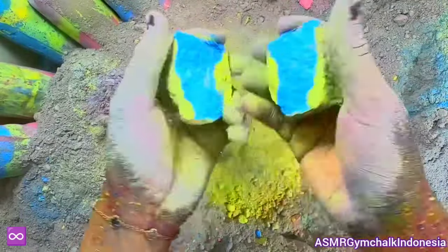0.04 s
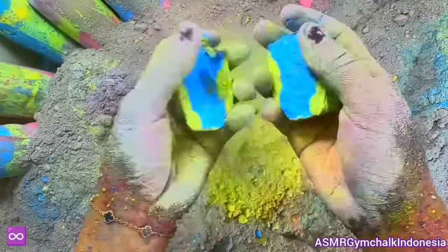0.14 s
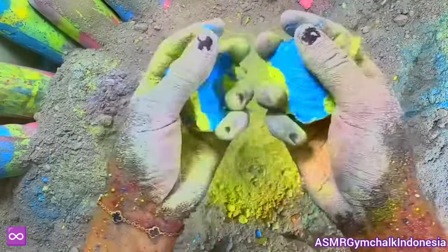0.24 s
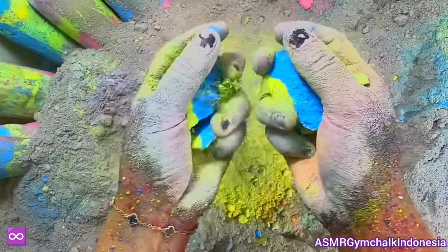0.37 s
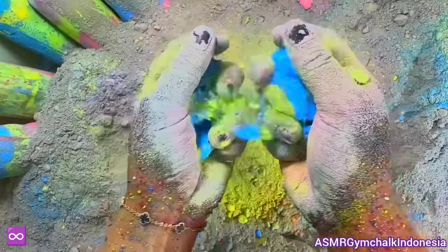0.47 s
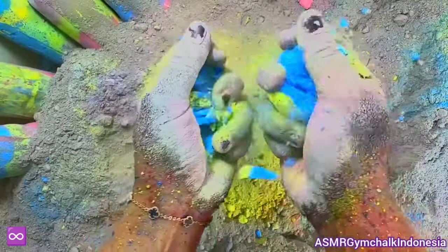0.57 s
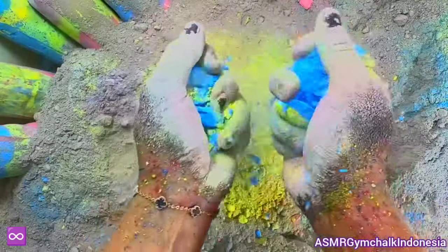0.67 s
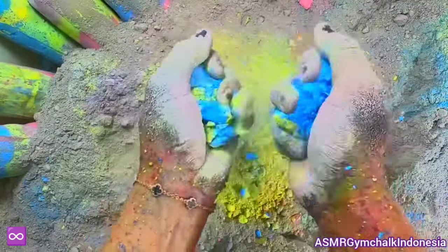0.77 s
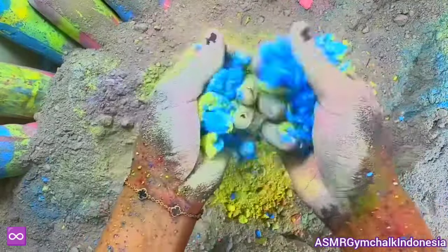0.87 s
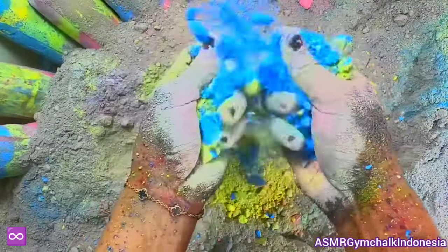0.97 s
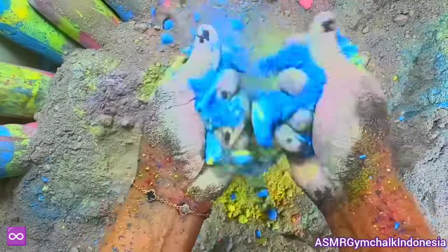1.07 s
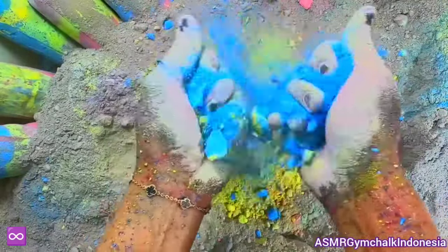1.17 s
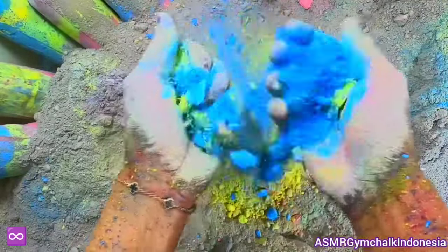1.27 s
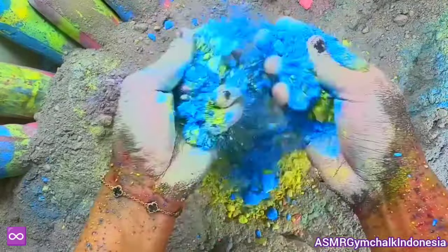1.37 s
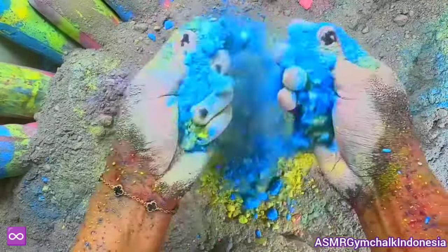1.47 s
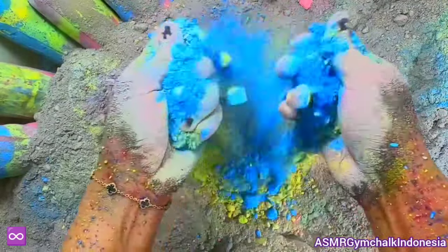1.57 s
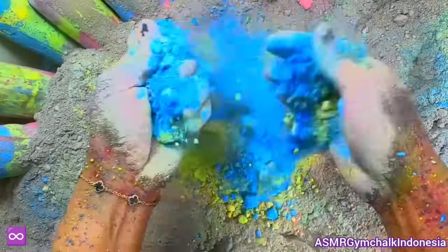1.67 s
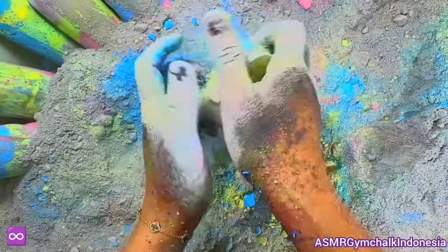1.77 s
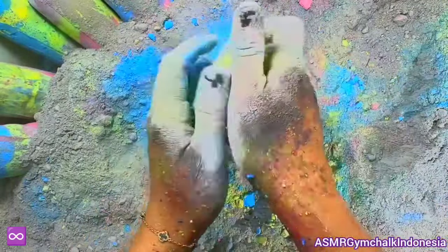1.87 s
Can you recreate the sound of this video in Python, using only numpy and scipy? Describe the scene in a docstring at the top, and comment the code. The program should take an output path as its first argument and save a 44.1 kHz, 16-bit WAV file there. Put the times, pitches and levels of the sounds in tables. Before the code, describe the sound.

Dry chalk snapping and crumbling between hands, loud and close, dropping abruptly to faint powdery rustling

```python
"""Soft chalk blocks snap in two hands over a heap of powder on a tray, close to a two-port phone microphone.
Each snap is a solid knock mixed with a burst of cracks, plus a bright chip, a trail of debris and a tray thud.
Beneath lie dense crunch from crumb-sized rings, dust fizz from fine clicks, dull tumbling lumps, tray hum and
filtered-noise rumble and room drone. The loudest peaks overload the recorder.
Near the end the sound drops abruptly to a quiet rustle."""
import sys
import numpy as np
from scipy import signal
from scipy.fft import rfft, irfft
from scipy.io import wavfile
from scipy.ndimage import uniform_filter1d

SR = 44100
rng = np.random.default_rng(int(sys.argv[2]) if len(sys.argv) > 2 else 0)


def wav_record(signal):
    """Record a signal, one row per channel, as 16-bit PCM in the file named by sys.argv[1]."""
    frames = np.transpose(np.atleast_2d(signal))
    bounded = np.clip(frames, -1, 1)
    # unit amplitude maps onto the largest positive 16-bit level
    quanta = np.round(bounded * 32767).astype(np.int16)
    wavfile.write(sys.argv[1], SR, quanta)


N = 83790  # length [samples]
DROP_S = 1.7188  # when the sound drops to the quiet rustle [s]


# Snaps of the chalk, close to the microphone; lengths under 1 ms play as 1 ms:
# (time [s], chunk level [dB], chunk pitch [Hz], thud level [dB], chip level [dB], chip pitch [Hz],
#  length [s], solid knock share [0-1])
CHALK_SNAPS = [(0.169, -47, 2350, -44, -33.5, 7250, 0.013, 0.1),
               (0.203, -19.5, 3580, -25.5, -26, 7050, 0.0039, 0.07),
               (0.2376, -12, 4000, -41, -24, 5440, 0.0015, 0.7),
               (0.2635, -32, 2780, -45, -34, 7200, 0.0023, 0.3),
               (0.28, -15.5, 2050, -31, -11.5, 6650, 0.0028, 0.39),
               (0.3053, -21, 3200, -37, -28, 7200, 0.0012, 0.16),
               (0.3138, -24, 3500, -41, -16, 7300, 0.0015, 0.1),
               (0.3315, -17, 1290, -34, -37, 6740, 0.0025, 0.58),
               (0.356, -19.5, 2050, -36, -32, 7740, 0.0022, 0.2),
               (0.36, -19.5, 1480, -26, -13.5, 7300, 0.0025, 0.1),
               (0.365, -3.5, 2540, -14.5, -38, 5800, 0.003, 0.71),
               (0.39, -24, 1220, -24, -25, 5300, 0.0018, 0),
               (0.404, -30, 1420, -40, -26, 7300, 0.0058, 0.3),
               (0.4223, -10.5, 1190, -24, -7, 6600, 0.0047, 0.75),
               (0.4298, -21, 2650, -28, -38, 6300, 0.0044, 0.05),
               (0.459, -3, 750, -16, -8.5, 6150, 0.0033, 0.5),
               (0.4615, -10, 1330, -22, -24, 4300, 0.0033, 0.17),
               (0.4665, -18, 380, -16, -35, 6200, 0.0065, 0.63),
               (0.4741, -9.5, 2710, -20, -14.5, 6300, 0.0091, 0.05),
               (0.4748, -8.5, 1260, -35, -22, 3700, 0.003, 0.32),
               (0.4773, -10.5, 790, -16.5, -15, 3500, 0.0046, 0.1),
               (0.4815, -10.5, 335, -11, -28, 5700, 0.007, 0.9),
               (0.487, -14.5, 1400, -25, -28, 3300, 0.0032, 0),
               (0.493, -32, 1450, -17, -32, 6250, 0.002, 0.1),
               (0.499, -13.5, 2200, -26, -33, 5940, 0.0075, 0.37),
               (0.5142, -9, 1400, -26, -32, 6100, 0.00365, 0.75),
               (0.52, -38, 1380, -23, -27, 4740, 0.0058, 0.4),
               (0.547, -24, 2300, -39, -32, 5000, 0.0037, 0.2),
               (0.5522, -8, 2500, -26, -19.5, 6350, 0.00273, 0.7),
               (0.567, -5, 1370, -14.5, -8, 6540, 0.0037, 0.16),
               (0.577, -10.5, 1730, -23, -6.5, 3030, 0.0035, 0.26),
               (0.5805, -20, 3420, -29, -39, 5300, 0.0033, 0.4),
               (0.586, -19, 1500, -25, -34, 3600, 0.0032, 0.3),
               (0.591, -21.5, 2370, -30, -39, 5970, 0.0076, 0.1),
               (0.596, -28, 1600, -50, -17.5, 6020, 0.0037, 0),
               (0.64, -19, 1340, -25, -33, 6400, 0.0051, 0.2),
               (0.645, -24, 1930, -35, -37, 5770, 0.0052, 0.3),
               (0.661, -8, 2200, -26, -27, 5300, 0.003, 0.53),
               (0.6626, -8.5, 1590, -21.5, -23, 2880, 0.0027, 0.24),
               (0.676, -9.5, 1940, -21, -17.5, 6650, 0.0045, 0.42),
               (0.681, -18.5, 2310, -33, -29, 4500, 0.0047, 0.4),
               (0.687, -31, 2070, -55, -37, 7190, 0.0025, 0.5),
               (0.7005, -14.5, 2100, -39, -32, 2900, 0.0022, 0.7),
               (0.722, -20, 1520, -35, -28, 4500, 0.0035, 0.18),
               (0.734, -21.5, 1490, -39, -28, 5700, 0.0056, 0.18),
               (0.863, -32, 1680, -60, -36, 6500, 0.028, 0.25),
               (0.879, -20.5, 1830, -33.5, -31, 6540, 0.012, 0.73),
               (0.956, -33, 1680, -32.5, -45, 5990, 0.013, 0.46),
               (0.979, -13, 522, -25, -40, 6800, 0.0048, 0.81),
               (0.99, -29, 1160, -25, -36, 6260, 0.018, 0.32),
               (1.011, -24.5, 1280, -47, -33, 6710, 0.011, 0.3),
               (1.039, -28.5, 1356, -53, -29, 6140, 0.014, 0),
               (1.053, -28.5, 1570, -32, -26, 5340, 0.013, 0.1),
               (1.065, -21.5, 1180, -25, -20, 6500, 0.0047, 0.06),
               (1.078, -27, 1130, -23.5, -28, 6460, 0.014, 0.24),
               (1.098, -33, 1300, -38, -16.5, 5860, 0.0066, 0.2),
               (1.108, -26, 1270, -24.5, -23.5, 5700, 0.0083, 0.3),
               (1.123, -22, 2400, -35.6, -17, 7600, 0.0042, 0.06),
               (1.1839, -14.5, 1150, -39, -21.5, 6740, 0.0026, 1),
               (1.1859, -25.5, 450, -21, -38, 6500, 0.005, 0.3),
               (1.1902, -29, 380, -44, -40, 6500, 0.0048, 0.4),
               (1.247, -30.5, 1460, -31, -26, 8440, 0.0036, 0.2),
               (1.35, -25.5, 2450, -30, -30, 3800, 0.008, 0.2),
               (1.361, -25.5, 1200, -27, -27, 5670, 0.006, 0.3),
               (1.427, -30, 1220, -39, -25.5, 7040, 0.0083, 0.2),
               (1.4317, -17, 1230, -28, -24, 7340, 0.0015, 0.5),
               (1.4532, -7.5, 1110, -23.5, -18, 1970, 0.0024, 0.96),
               (1.4724, -16, 1050, -30, -33.5, 5630, 0.0036, 0.73),
               (1.4848, -10.5, 1140, -27.5, -45, 5400, 0.0036, 0.99),
               (1.508, -26, 1710, -30, -34, 5840, 0.0044, 0.3),
               (1.527, -38, 1240, -22.5, -35, 7110, 0.0064, 0.4),
               (1.537, -33, 875, -33, -38, 6890, 0.0043, 0.05),
               (1.573, -31.5, 1010, -31, -34.5, 6700, 0.0084, 0.3),
               (1.604, -20, 1980, -36, -26, 7950, 0.0054, 0.28),
               (1.614, -24.5, 495, -30, -38, 5900, 0.0083, 0.9),
               (1.624, -22.5, 500, -36, -30, 1800, 0.0076, 0.86),
               (1.71, -24.5, 1980, -39, -42, 6400, 0.0038, 0.52),
               (1.7168, -11, 2400, -27.5, -20.5, 1210, 0.00086, 0.88),
               (1.718, -22, 3780, -44, -38, 5400, 0.00087, 0.58),
               (1.732, -52, 2380, -48.5, -32, 5840, 0.0054, 0.2),
               (1.866, -43.5, 2780, -62, -65, 6320, 0.02, 0)]
CHUNK_Q, WIDE_Q, CHIP_Q = 6.2, 0.46, 1.72  # sharpness of the narrow chunk, broad chunk and chip
WIDE_DB, AIR_DB = 2, -38  # broad chunk relative to narrow chunk, hiss relative to chip [dB]
RISE_S, DEBRIS_S, DEBRIS_DB = 0.00011, 0.013, -13  # onset [s], debris decay [s], debris level [dB]
CRACKS_PER_S, CRACK_SPREAD_DB = 6000, 4  # crack rate [1/s], unevenness of the crack sizes [dB]
HUSH_S = 0.024  # snaps and their tails are silent this long after the drop [s]


def snaps():
    """Breaking chalk: a knock or resonant crack burst, with debris, a bright chip and a thud in the tray."""
    t, out = np.arange(4000) / SR, np.zeros(N + 4000)
    air = signal.butter(2, 4000, "highpass", fs=SR, output="sos")
    thud = tray_thud(t)
    for s, db, hz, thud_db, chip_db, chip_hz, length, solid in CHALK_SNAPS:
        length, solid = max(length, 0.001), np.clip(solid, 0, 1)
        decay = np.exp(-(t / length) ** 3) + gain_of(DEBRIS_DB) * np.exp(-t / DEBRIS_S)
        shape = np.minimum(t / RISE_S, 1) * decay
        grit = cracks(len(t), CRACKS_PER_S, CRACK_SPREAD_DB) + 0.31 * rng.standard_normal(len(t))
        raw = shape * grit

        # a solid knock is a smooth, very short tone centred halfway through the snap
        centred = t - length / 2
        knock = 2 * np.exp(-0.5 * (centred / (length * 0.21)) ** 2) * np.sin(2 * np.pi * hz * centred)

        narrow = ring(raw, hz, hz / CHUNK_Q)
        broad = ring(ring(raw, hz, hz / WIDE_Q), hz, hz / WIDE_Q)
        chip = ring(ring(raw, chip_hz, chip_hz / CHIP_Q), chip_hz, chip_hz / CHIP_Q)
        hiss = signal.sosfilt(air, raw)
        # each part is scaled by its strength during the snap itself
        span = round(length * SR) + 20
        narrow, broad, chip, hiss = [p / np.std(p[:span]) for p in (narrow, broad, chip, hiss)]

        body = (1 - solid) * (narrow + gain_of(WIDE_DB) * broad) + solid * knock
        bright = gain_of(chip_db) * (chip + gain_of(AIR_DB) * hiss)
        i = round(s * SR)
        out[i:i + len(t)] += gain_of(db) * body + bright + gain_of(thud_db) * thud
    t = np.arange(N) / SR
    return np.where((t < DROP_S) | (t > DROP_S + HUSH_S), out[:N] + room(out[:N]), 0)


PUSH_S, THUMP_DB = 0.00026, -8.5  # time scale of the push [s], its direct thump beside the ringing [dB]


def tray_thud(t):
    """A short push on the tray, heard directly and through the ringing modes."""
    push = np.gradient((t / PUSH_S) ** 3 * np.exp(-t / PUSH_S))
    ringing = tray(push)
    return ringing / np.std(ringing[:300]) + gain_of(THUMP_DB) * push / np.std(push[:300])


# Modes of the tray under the powder: (frequency [Hz], width [Hz], level [dB])
TRAY_MODES = [(331.6, 17.3, 4), (488, 20, 0.5), (760, 143, -10.5), (218, 440, -15), (373.2, 16, -4)]


def tray(x):
    """The tray's low modes, resonating in parallel."""
    return sum(gain_of(db) * ring(x, hz, width) for hz, width, db in TRAY_MODES)


# Spectra of crunch, dust fizz and pressing hands: (frequency [Hz], relative level [dB])
CRUNCH_SPECTRUM = [(300, -28), (500, -2.5), (800, -4.5), (1150, -0.5), (1400, -4), (1650, -7), (1900, 1),
                   (2250, -5.5), (2700, -2), (3300, -5.5), (4000, -7), (5500, -14), (8000, -19)]
FIZZ_SPECTRUM = [(1500, -15), (3000, -4.5), (4500, -5), (6200, 1), (8400, 1), (10500, -3), (13000, -15),
                 (15400, 3)]
RUMBLE_SPECTRUM = [(12, -45), (25, -40), (43, -2.5), (80, 0), (97, 6.5), (128, -4), (162, -10),
                   (250, -17.5), (320, -1.5), (550, -120)]


def crumble():
    """Steady crunch and dust fizz share one clustering, which also drives the tray hum; hands add rumble."""
    shared = clumps(0.0043, 1.52) * clumps(0.013, 1.07)
    crumbs = grains(7000, 1.6, 475, 6150, 1.03, count=16) + 1.15 * rng.standard_normal(N)
    crunch = evened(shared * colour(crumbs, CRUNCH_SPECTRUM))
    # the dust clusters less strongly than the crumbs
    fizz = evened(shared ** 0.78 * colour(cracks(N, 20000, 0.96), FIZZ_SPECTRUM))
    low = signal.butter(2, 600, fs=SR, output="sos")
    hum = evened(signal.sosfilt(low, tray(shared * cracks(N, 2500, 3.3))))
    rumble = evened(colour(rng.standard_normal(N) * clumps(0.028, 0.92), RUMBLE_SPECTRUM))
    return (crunch * level(column=1) + fizz * level(column=2)
            + hum * level(column=3) + rumble * level(column=4))


# Steady layers before the drop, and the quiet rustle after it:
# (time [s], crunch level [dB], dust fizz level [dB], tray hum level [dB], rumble level [dB])
CRUSHING_LEVELS = [(0, -57, -33, -47, -35), (.1, -65, -34.5, -43, -35.5), (0.178, -48, -35, -58, -35.5),
                   (0.206, -26.5, -28, -38, -36), (.3, -44.5, -26, -35, -33.5),
                   (.38, -25.5, -29.5, -22, -34.5), (.45, -22.5, -27, -38, -30.5),
                   (0.501, -18, -14.5, -49, -20.5), (.54, -22, -29, -26, -31), (.59, -18, -29, -25, -20),
                   (0.618, -23.5, -29, -60, -32), (.69, -22, -23, -59, -24), (.75, -24.5, -26, -35, -31),
                   (.79, -28.5, -33, -38, -30), (0.832, -35.5, -38.5, -58, -32),
                   (0.873, -22.5, -27, -43, -40), (.97, -30, -37.5, -30, -37), (1, -25.5, -28, -26.5, -26),
                   (1.1, -24.5, -24, -35, -31), (1.2, -24, -26, -30.5, -26), (1.27, -36.5, -32, -32, -40),
                   (1.35, -26, -30, -39.5, -46), (1.41, -28.5, -28, -33, -38), (1.5, -26, -35, -24, -25.5),
                   (1.58, -31.5, -32.5, -33, -29.5), (1.66, -29.5, -27.5, -28.5, -35),
                   (1.71, -33.5, -31.5, -39, -36)]
RUSTLE_LEVELS = [(1.72, -42.5, -36.5, -71, -45), (1.77, -39.5, -29, -40, -44),
                 (1.82, -46, -40.5, -56, -36.5), (1.9, -48, -34, -46, -44)]


def level(column):
    """Gain curve of one steady layer, jumping at the drop."""
    t = np.arange(N) / SR
    before, after = np.array(CRUSHING_LEVELS), np.array(RUSTLE_LEVELS)
    crushing_db = np.interp(t, before[:, 0], before[:, column])
    rustle_db = np.interp(t, after[:, 0], after[:, column])
    return gain_of(np.where(t < DROP_S, crushing_db, rustle_db))


# Dull lumps rolling in the palms: (time [s], level [dB])
LUMP_LEVELS = [(0, -46), (.19, -60), (.3, -45), (.45, -37), (.5, -24), (.56, -43), (.7, -38), (.8, -44.5),
               (0.972, -40), (0.985, -26.5), (1.03, -30), (1.1, -35), (1.2, -30.5), (1.28, -36),
               (1.36, -28.5), (1.48, -27.5), (1.56, -29.5), (1.65, -30.5), (1.715, -29.5)]
LUMP_RING_DB = 1  # ringing of two upper tray modes relative to the lumps [dB]


def lumps():
    """Larger, duller crumbs that tumble and split, sparser than the crunch; they ring the tray."""
    t, (s, db) = np.arange(N) / SR, np.transpose(LUMP_LEVELS)
    low = signal.butter(2, 2200, fs=SR, output="sos")
    dull = clumps(0.018, 1.7) * signal.sosfilt(low, grains(900, 1.34, 454, 1537, 2.1, count=12))
    upper = sum(gain_of(mode_db) * ring(dull, hz, width) for hz, width, mode_db in TRAY_MODES[1:3])
    mixed = evened(evened(dull) + gain_of(LUMP_RING_DB) * evened(upper))
    return mixed * gain_of(np.interp(t, s, db)) * (t < DROP_S)


def cracks(size, per_s, spread_db):
    """Random clicks of either sign; a few are large."""
    draw = rng.random((size, 3))
    happens = draw[:, 0] < per_s / SR
    sign = np.sign(draw[:, 1] - 0.5)
    strength = gain_of(-spread_db * np.maximum(np.log(draw[:, 2] + 1e-9), -5))
    return happens * sign * strength


def clumps(span_s, depth_db):
    """A random gain that wanders over span_s, as when grains break in clusters."""
    k = max(round(span_s * SR), 1)
    wander = uniform_filter1d(uniform_filter1d(rng.standard_normal(N), k), k)
    return gain_of(depth_db * evened(wander))


def grains(per_s, spread_db, lo_hz, hi_hz, cycles, count):
    """Crumbs of many sizes, each a few cycles at its own pitch."""
    out, t = np.zeros(N), np.arange(900) / SR
    for hz in np.geomspace(lo_hz, hi_hz, count):
        crumb = np.sin(2 * np.pi * hz * t) * np.exp(-t * hz / cycles) * (1 - np.exp(-t * hz * 2))
        out += signal.oaconvolve(cracks(N, per_s / count, spread_db), hz * crumb)[:N]
    return evened(out)


def ring(x, hz, width):
    """A two-pole resonance of gain 1 at its peak."""
    return signal.lfilter(*signal.iirpeak(hz, hz / width, SR), x)


def gain_of(db):
    """Amplitude factor for a level in dB."""
    return 10 ** (np.asarray(db) / 20)


def evened(x):
    """Scales a signal to an RMS of 1."""
    return x / np.sqrt(np.mean(x ** 2) + 1e-20)


def read(points, hz):
    """Table value on a log-frequency axis."""
    f, value = np.transpose(points)
    return np.interp(np.log(hz + 1), np.log(f + 1), value)


def colour(x, points):
    """Applies a spectrum in dB, falling 30 dB over the octave outside each end."""
    hz = np.fft.rfftfreq(len(x), 1 / SR)
    below = (points[0][0] / 2, points[0][1] - 30)
    above = (points[-1][0] * 2, points[-1][1] - 30)
    return irfft(rfft(x) * gain_of(read([below] + list(points) + [above], hz)), len(x))


ROOM_DB, ROOM_T60 = -8, 0.061  # level of the tail [dB], time to fall by 60 dB [s]


def room(x):
    """A short tail of scattered reflections, starting 3 ms after the direct sound."""
    t = np.arange(SR // 4) / SR
    taps = rng.standard_normal(len(t)) * gain_of(-60 * t / ROOM_T60) * (t > 0.003)
    return gain_of(ROOM_DB) * signal.fftconvolve(x, taps / np.linalg.norm(taps))[:N]


# Steady low drone of the room: (frequency [Hz], relative level [dB])
DRONE_SPECTRUM = [(150, -8), (230, -5), (300, -1), (350, -2.5), (420, -31)]
DRONE_DB = -46  # level [dB]


def drone():
    """A faint steady low drone of filtered noise under everything."""
    return gain_of(DRONE_DB) * evened(colour(rng.standard_normal(N), DRONE_SPECTRUM))


# The microphone's two close ports; the lead share is limited to -1..1:
# (frequency [Hz], difference minus sum level [dB], share of the difference that is a pure phase lead)
PORT_DIFFERENCE = [(60, -28, 0), (140, -15, 0.1), (343, -13, 0.28), (417, -11, 0.1), (517, -6.5, 0.02),
                   (870, -3, -0.26), (1230, -12, 0.64), (1810, -18.5, 0.1), (2960, -4, 0.6),
                   (3750, -3.5, 0.2), (6140, -5, -0.1), (8060, 1.5, -1.1), (10020, 5, -0.4),
                   (10700, 20.5, -0.5), (15500, 15, -0.8)]
SHIFT_HZ = 12  # typical rate at which random scatter filters trade places, keeping the channels loosely alike [Hz]


def ports(x):
    """A phase lead plus shifting scattered sound; the channels' difference outweighs their sum in the treble."""
    hz, t = np.fft.rfftfreq(N, 1 / SR), np.arange(1500) / SR
    scatter = rfft(rng.standard_normal((3, len(t))) * np.exp(-t / 0.0029), N)
    # three random filters trade places at an uneven pace; their squared shares always sum to 1
    turn = 2 * np.pi * np.cumsum(SHIFT_HZ * clumps(0.051, 3.0)) / SR
    share = np.sqrt(2 / 3) * np.cos(turn + 2 * np.pi / 3 * np.arange(3)[:, None])
    scattered = (rfft(x * share) * scatter / abs(scatter)).sum(0)

    apart = gain_of(read([row[:2] for row in PORT_DIFFERENCE], hz))
    lead = np.clip(read([row[::2] for row in PORT_DIFFERENCE], hz), -1, 1)
    middle = rfft(x)
    side = apart * (1j * lead * middle + np.sqrt(1 - lead ** 2) * scattered)
    return irfft(np.array([middle + side, middle - side]) / np.sqrt(1 + apart ** 2), N)


def scene():
    """All sources near the tray, and the room drone, heard through the two ports."""
    return ports(snaps() + crumble() + lumps() + drone())


CEILING, KNEE = 1.02, 9.0  # overload ceiling [amplitude], abruptness of the flattening
EDGE_HZ = 15600  # upper band limit [Hz]


def record(dry):
    """Overload flattens the peaks; then the band limit removes the highest treble."""
    clipped = dry / (1 + abs(dry / CEILING) ** KNEE) ** (1 / KNEE)
    lowpass = signal.firwin(255, EDGE_HZ, window=("kaiser", 5), fs=SR)
    return signal.oaconvolve(clipped, lowpass[None], "same")


dry = scene()
out = record(dry)
wav_record(out)
```